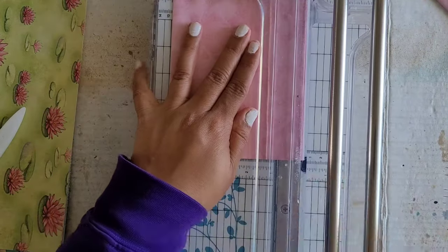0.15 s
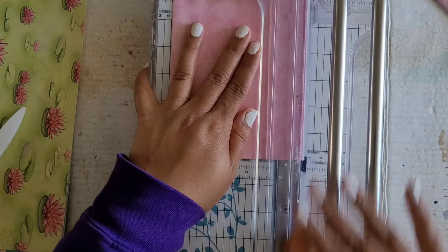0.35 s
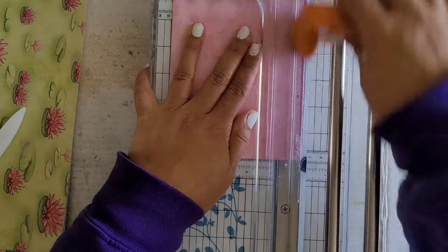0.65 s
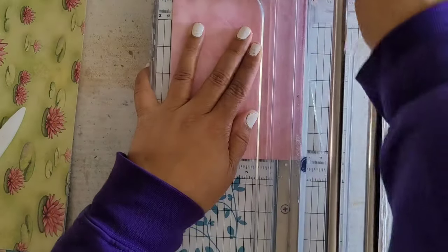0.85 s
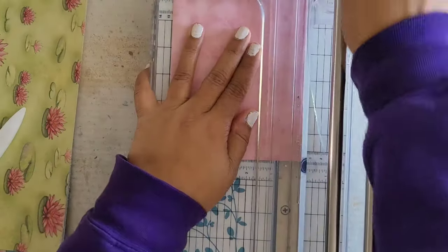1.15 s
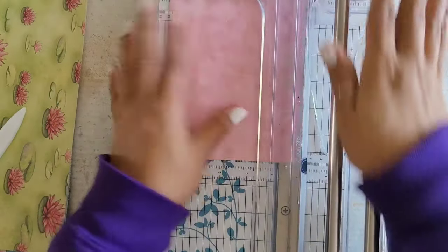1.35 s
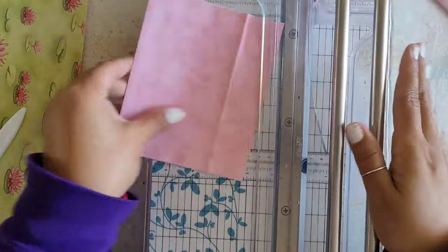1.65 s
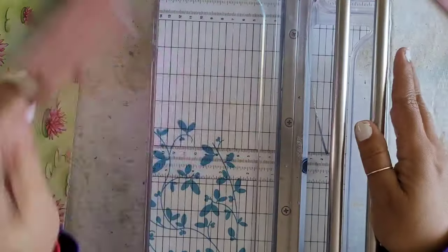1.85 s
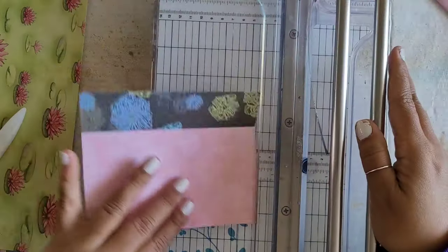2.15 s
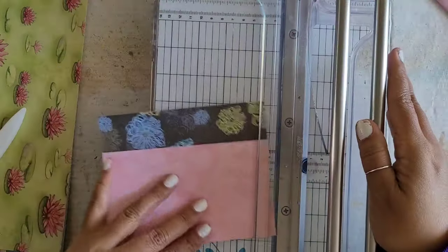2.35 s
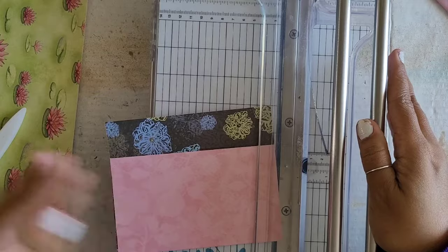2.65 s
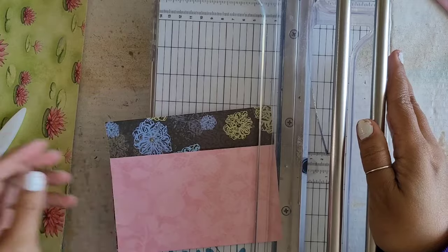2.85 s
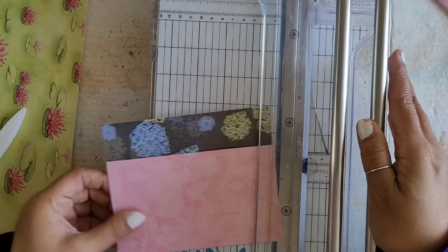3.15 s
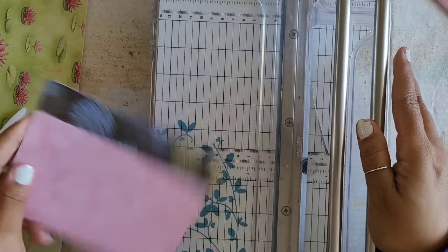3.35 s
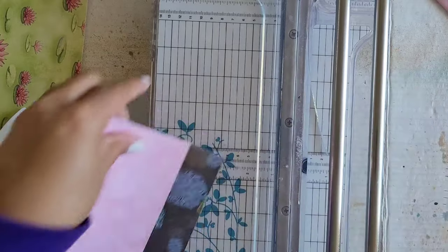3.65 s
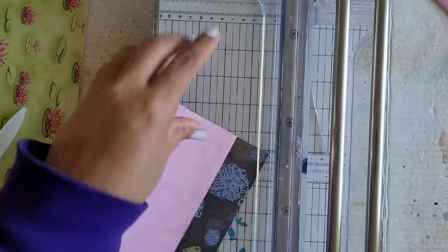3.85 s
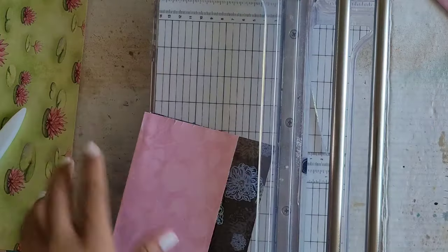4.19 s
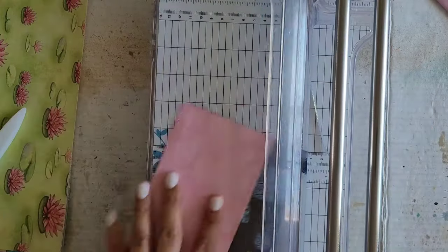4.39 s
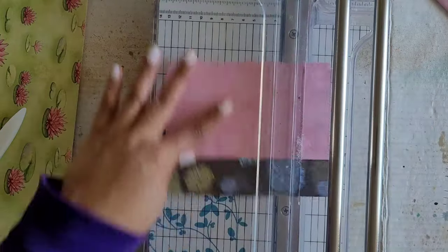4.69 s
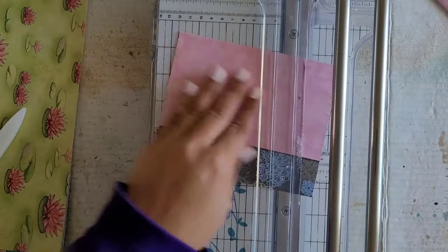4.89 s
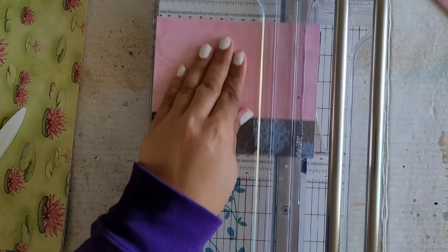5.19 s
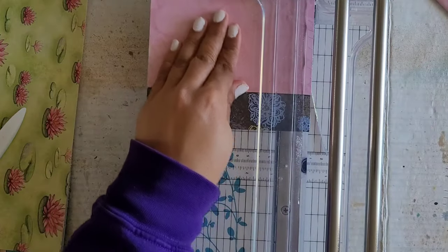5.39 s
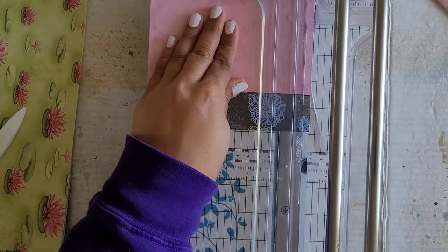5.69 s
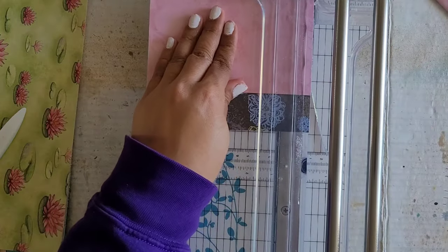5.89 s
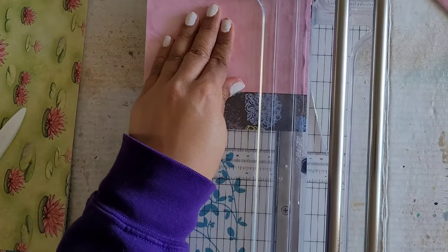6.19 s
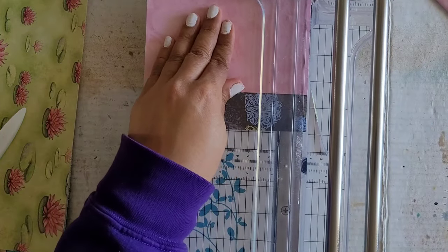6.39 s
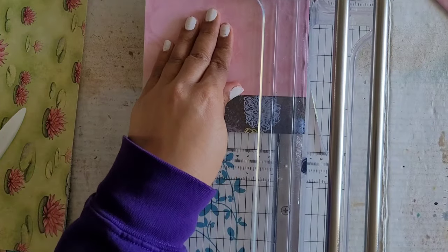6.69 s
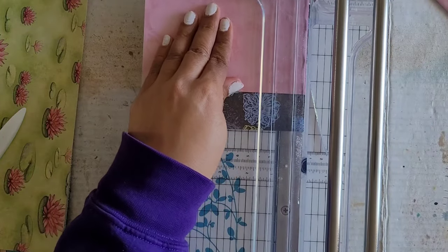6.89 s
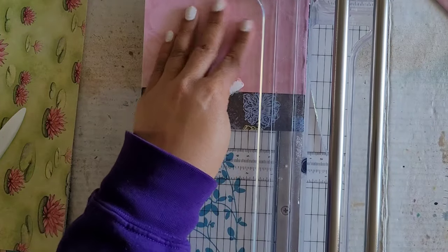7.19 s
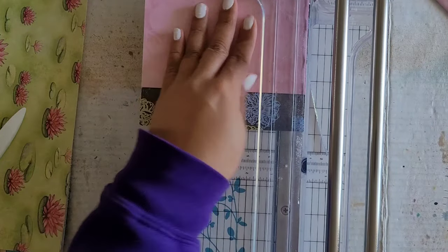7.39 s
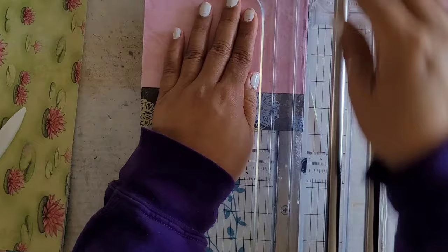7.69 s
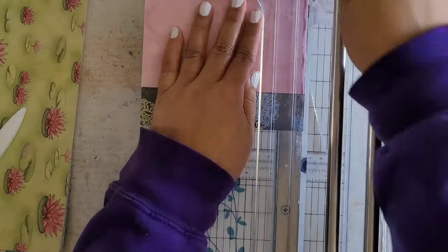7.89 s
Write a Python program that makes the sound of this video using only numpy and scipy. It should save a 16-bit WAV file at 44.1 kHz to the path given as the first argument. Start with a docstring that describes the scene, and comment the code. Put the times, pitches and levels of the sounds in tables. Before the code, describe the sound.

Close rasping cut through card with two hollow knocks, then papery hisses and light taps, a sharp plastic clack, and quiet nudging over faint hum.

```python
"""A plastic paper trimmer on a craft table in a small room, heard from close above, while something hums faintly.
First the blade carriage runs up its rail through a card, scraping and tearing, and knocks at the end.
The card is pulled out, turned and slid back: filtered random grains hiss and rub, short bursts crackle.
The clear guard snaps down and rings as fading sines, fingers nudge the card, and a second stroke just starts.
Taps and knocks are clicks that set resonances of the trimmer ringing."""
import sys
import numpy as np
from scipy import signal
from scipy.fft import rfft, irfft, next_fast_len
from scipy.io import wavfile

SR = 44100
rng = np.random.default_rng(int(sys.argv[2]) if len(sys.argv) > 2 else 0)


def generate_wav(signal):
    """Clip the signal to [-1, 1] and save it as 16-bit WAV at the path in sys.argv[1]."""
    frames = np.transpose(np.atleast_2d(signal))
    scaled = np.clip(frames, -1, 1) * 32767
    pcm = np.round(scaled).astype(np.int16)
    wavfile.write(sys.argv[1], SR, pcm)


N = 354563
TIME = np.arange(N) / SR   # seconds

# Table levels are relative: the settings given in scene() raise or lower most of them.
# The carriage knocking along its rail.
# Each row: time in seconds, knock in dB, thud in dB, tick in dB, pitch of the struck spot in Hz.
KNOCKS = [(0.3113, -15, -20.5, -26, 564), (0.966, -15, -9, -20, 1355), (1.096, -17, -10.5, -21.5, 1607),
          (7.961, -43, -52, -47, 2200)]
# The guard snapping down and rattling.
# Each row: time in seconds, knock in dB, thud in dB, tick in dB, pitch of the struck spot in Hz.
SNAPS = [(4.8346, -32, -18.5, -8, 815), (4.8405, -33, -30.5, -25, 620), (4.849, -24, -37, -28, 1240),
         (4.873, -26.5, -28, -30, 640)]
# Tone of the hollow rail. Each row: frequency in Hz, level in dB.
RAIL = [(300, -19), (900, -13.5), (1180, 6.5), (1460, 11.5), (1700, -1.5), (2000, 3), (3000, -45.5)]
# Tone of the card's fine hiss. Each row: frequency in Hz, level in dB.
HISS = [(2200, -17), (2800, -6), (4200, -8), (6400, -8), (8000, -17), (11900, -13.5), (16000, -24)]
# Tone of the guard's hard crack. Each row: frequency in Hz, level in dB.
CRACK = [(1500, -0.5), (4000, -2.5), (11500, -9.5), (16000, -14)]


def from_db(db):
    """Decibels to gain."""
    return 10 ** (np.asarray(db) / 20)


def rms_one(x):
    """Scale to unit power."""
    return x / np.sqrt(np.mean(x ** 2) + 1e-20)


def at_hz(points, hz):
    """Read a table on a log-frequency axis."""
    points = np.array(points)
    return np.interp(np.log(np.maximum(hz, 1)), np.log(points[:, 0]), points[:, 1])


def pan(db):
    """Left-over-right balance as a pair of gains."""
    return from_db(np.array([[db], [-db]]) / 2)


def drift(rate):
    """Random wander of spread 1, heading for a new value rate times a second."""
    knots = rng.standard_normal(8192)
    return rms_one(np.interp(TIME * rate, np.arange(len(knots)), knots))


def colour(pair, spectrum):
    """Two unrelated signals become left and right with the given spectrum and set likeness; power is kept."""
    # How alike left and right are. Each row: frequency in Hz, left-right correlation.
    likeness = [(100, 0.95), (500, 0.78), (1200, 0.23), (2500, 0.18), (6000, 0.29), (14000, 0.086)]
    size = next_fast_len(pair.shape[1])
    hz = np.arange(size // 2 + 1) * SR / size
    # the sound falls off steeply beyond both ends of the spectrum table
    low_cut = np.sqrt(1 + (.7 * spectrum[0][0] / (hz + 1)) ** 8)
    high_cut = np.sqrt(1 + (.7 * hz / spectrum[-1][0]) ** 8)
    shape = rms_one(from_db(at_hz(spectrum, hz)) / low_cut / high_cut)
    alike = np.clip(at_hz(likeness, hz), -1, 1)
    mid, side = rfft(pair, size) * shape
    shared = np.sqrt((1 + alike) / 2) * mid
    opposed = np.sqrt((1 - alike) / 2) * side * [[1], [-1]]
    return irfft(shared + opposed, size)[:, :pair.shape[1]]


def friction(per_s, spread_db):
    """Fibres catch and let go at random, a few much harder than the rest."""
    sizes = from_db(spread_db * np.minimum(rng.exponential(1, N), 5))
    caught = rng.random(N) < per_s / SR
    return rms_one(caught * sizes * rng.standard_normal((2, N)))


def clicks(times, sizes):
    """One click at each time."""
    out = np.zeros(N)
    np.add.at(out, np.clip(np.round(times * SR).astype(int), 0, N - 1), sizes)
    return out


def paired_clicks(times, sizes, faint_db, lead_s=0.00356):
    """One click at each time, with a fainter click shortly before it."""
    return clicks(times - lead_s, sizes * from_db(faint_db)) + clicks(times, sizes)


def ring(force, hz, width):
    """A unit click sets a damped sine of height 1 ringing; a wider resonance (Hz) dies faster."""
    r, w = np.exp(-np.pi * width / SR), 2 * np.pi * hz / SR
    return signal.lfilter([0, np.sin(w)], [1, -2 * r * np.cos(w), r * r], force + 1e-18)


def spot(force, hz):
    """A struck spot of the bed takes a cycle or two to swing up, then dies."""
    width = hz * 0.27
    return ring(ring(force, hz, width), hz, width) * 2 * np.e * np.pi * width / SR


def swell(force, seconds):
    """A unit click swells to height 1 in the given time and dies away."""
    r = np.exp(-1 / (seconds * SR))
    return signal.lfilter([0, np.e * r / (seconds * SR)], [1, -2 * r, r * r], force + 1e-18)


def bursts(rows, decay_s):
    """Envelope of sudden catches that each die away."""
    s, db = np.transpose(rows)
    return signal.lfilter([1], [1, -np.exp(-1 / (decay_s * SR))], clicks(s, from_db(db)) + 1e-18)


def move(start_s, length_s, attack_s, release_s):
    """Envelope of a movement: it gathers speed smoothly, holds and dies away."""
    age = TIME - start_s
    rise = np.sin(np.pi / 2 * np.clip(age / attack_s, 0, 1)) ** 2
    return rise * np.exp(-np.maximum(age - length_s, 0) / release_s)


def rasp(hz, width_hz):
    """Coarse friction rings a resonance that moves with the point of contact."""
    turn = np.exp(2j * np.pi * np.cumsum(hz) / SR)
    grains = colour(friction(2500, 2.5), HISS)
    # shift the moving pitch down to zero, keep a narrow band there, and shift it back up
    narrow = signal.butter(2, width_hz / 2, fs=SR, output="sos")
    return rms_one((signal.sosfilt(narrow, grains / turn) * turn).real)


def room(dry, early_db, early_s, tail_db):
    """Quick reflections off the table and near things, then a diffuse tail with its own fading time in each band."""
    # Each row: centre of the band in Hz, seconds the tail takes to fall by 60 dB.
    fade_times = [(150, 1), (600, 0.2), (2000, 0.46), (5000, 0.37), (12000, 0.12)]
    t = TIME[:SR // 2]
    hz = np.arange(len(t) // 2 + 1) * SR / len(t)
    scatter = colour(rng.standard_normal((2, len(t))), [(60, 0), (16000, 0)]) / np.sqrt(len(t))
    echo = from_db(early_db) * scatter * rms_one(np.exp(-t / early_s) * (t > .0015))
    for centre, t60 in fade_times:
        share = at_hz([(f, f == centre) for f, _ in fade_times], hz)   # 1 at this centre, 0 at the others
        band = irfft(rfft(scatter) * share, len(t))
        echo += from_db(tail_db) * band * rms_one(from_db(-60 * t / t60) * (t > .006))
    return dry + signal.fftconvolve(dry, echo, axes=1)[:, :N]


def background(air_db, hum_db, waver):
    """Dull steady air noise with a few slightly wavering tones."""
    # Tone of the air noise. Each row: frequency in Hz, level in dB.
    air = [(35, -11.5), (60, 4.5), (85, -8.5), (170, 3.5), (300, -5), (500, -11.5), (1200, -20),
           (1700, -33.5), (2500, -38.5), (3500, -31), (5000, -48), (6400, -29.5), (7800, -62.5),
           (16000, -40)]
    # Steady tones. Each row: frequency in Hz, level in dB.
    tones = [(82, -60.5), (120, -61), (1125, -71)]
    hum = 0
    for hz, db in tones:
        phase = 2 * np.pi * hz * TIME + waver * drift(3.4)
        hum += from_db(db + hum_db) * np.sqrt(2) * np.sin(phase)
    return from_db(-56 + air_db) * colour(rng.standard_normal((2, N)), air) + hum


def forearms(lumpy_db):
    """Arms and sleeves drag unevenly on the table top."""
    # Forearms shifting. Each row: start in seconds, length in seconds, level in dB.
    arm_moves = [(0, 1.57, -52.5), (1.9, 0.82, -60.5)]
    # Their tone through the table top. Each row: frequency in Hz, level in dB.
    dull = [(60, -1), (130, 4), (200, 2), (330, -9)]
    level = sum(from_db(db) * move(s, length, attack_s=0.014, release_s=0.097) for s, length, db in arm_moves)
    return level * from_db(lumpy_db * drift(22.78)) * colour(rng.standard_normal((2, N)), dull)


def table_bumps():
    """Heavy contacts reach the table top, which booms briefly."""
    # Heavy contacts, the guard snap among them, shaking the table. Each row: time in seconds, level in dB.
    bumps = [(0.969, -34), (2.135, -28.5), (4.84, -27.5)]
    # Resonances of the table top. Each row: frequency in Hz, width in Hz, level in dB.
    modes = [(155, 9.5, -13), (230.2, 44, 1), (376, 170, 8)]
    s, db = np.transpose(bumps)
    return sum((-1) ** k * ring(clicks(s, from_db(db + level)), hz, width)
               for k, (hz, width, level) in enumerate(modes))


def nudges(nudge_db):
    """Fingertips nudge the card: each short push swells and dies away."""
    # Each row: middle of the push in seconds, half length in seconds, level in dB.
    pushes = [(6.062, 0.028, -65), (6.26, 0.017, -57.5), (6.771, 0.018, -61.5), (6.922, 0.016, -56),
              (7.328, 0.036, -54.5)]
    return sum(from_db(db + nudge_db) * np.exp(-.5 * ((TIME - s) / half) ** 2) for s, half, db in pushes)


def slides():
    """Gains of the hiss, its top and the rub; each slide gathers speed, holds and dies away."""
    # The card pulled, turned and pushed over the bed.
    # Each row: start in seconds, length in seconds, hiss in dB, rub in dB, lift of the hiss's top in dB.
    card_moves = [(1.256, 0.36, -55.5, -51.5, 3), (1.658, .16, -55, -46, 7), (1.816, 0.24, -56.5, -59, 9.5),
                  (2.17, 0.49, -59, -62.5, 3.5), (2.39, 0.16, -56, -83, 1), (3.277, 0.092, -57, -64, 3.5),
                  (3.346, 0.46, -62.5, -62, 6.5), (3.828, 0.35, -68, -65, 7.5),
                  (4.425, 0.04, -46.5, -50, 3), (4.518, 0.11, -40.5, -52.5, 1),
                  (4.658, 0.25, -47, -53.5, 7), (5.086, 0.017, -50.5, -49.5, 1),
                  (5.142, 0.38, -52, -60, 1.5), (7.465, 0.099, -53, -53.5, 3.5),
                  (7.628, 0.6, -64, -64, -4.5)]
    s, length, hiss, rub, lift = np.transpose(card_moves)
    # the rise takes a third of each slide's length
    shapes = np.array([move(start, span, 0.33 * span, release_s=0.046) for start, span in zip(s, length)])
    return from_db([hiss, hiss + lift, rub]) @ shapes


def card(hiss_db, rub_db, scratch_db, flutter_db, clump_db, top_hz):
    """Sliding card hisses, its edge scratches at a wandering pitch; pressed edges catch in clumps and rub the bed."""
    # Tone of the rub through the bed. Each row: frequency in Hz, level in dB.
    rub_tone = [(350, 2), (650, 8.5), (1000, -1), (1400, 3.5), (3200, -5.5)]
    hiss, top, rub = slides()
    flutter = flutter_db * drift(40)
    fibres = colour(friction(14000, 2.6), HISS)
    treble = signal.sosfiltfilt(signal.butter(2, top_hz, "high", fs=SR, output="sos"), fibres)
    fine = (hiss * from_db(hiss_db) + nudges(nudge_db=-6.0)) * fibres
    fine += (top - hiss) * from_db(hiss_db) * treble   # brightens or dulls each slide
    fine *= from_db(flutter)
    clumps = clump_db * drift(70)
    scratch_hz = 3600 * np.exp(.18 * drift(11))
    scratch = hiss * from_db(scratch_db + clumps) * rasp(scratch_hz, width_hz=380)
    catches = friction(2200, 2.6)
    return fine + scratch + rub * from_db(rub_db + clumps) * colour(catches, rub_tone)


def crackles(crackle_s, knock_hz):
    """Small dry crackles with a low knock, from the card and just before the guard snaps."""
    # Each row: time in seconds, crackle in dB, low knock in dB.
    small_sounds = [(1.3239, -44.5, -38.5), (1.4432, -40.5, -39), (1.556, -48, -63), (1.704, -59, -43),
                    (1.749, -47, -38), (1.791, -43, -38), (2.035, -43, -39), (3.238, -53.5, -52.5),
                    (3.361, -42, -49), (3.648, -66, -42), (3.763, -52, -48), (4.824, -45, -30),
                    (7.454, -56, -50), (7.505, -54, -38.5), (7.553, -55, -43.5)]
    # Tone of the crackle. Each row: frequency in Hz, level in dB.
    crinkle = [(1000, 3), (4000, -5), (13000, -16)]
    s, crackle, low_knock = np.transpose(small_sounds)
    crisp = swell(clicks(s, from_db(crackle)), crackle_s) * rng.standard_normal((2, N))
    return colour(crisp, crinkle) + spot(clicks(s, from_db(low_knock)), knock_hz)


def strike(rows, crack, body_db, spot_db, tick_db, tick_s, tick_pan_db, faint_db):
    """Each blow rings the spot it hits and the trimmer: low modes by its thud, high by its knock, plus a crack."""
    # The plastic bed and rail. Each row: frequency in Hz, width in Hz, level in dB.
    trimmer = [(489.7, 110, -0.5), (799, 250, 0), (1060, 220, -3), (1300, 200, -4.5), (1980, 350, -8.5),
               (3024, 700, -10), (4170, 650, -20)]
    s, knock, thud, tick, pitch = np.transpose(rows)

    def force_db(hz):
        """Strength of each blow: the thud up to 800 Hz, passing to the knock over half an octave."""
        return thud + np.clip(np.log2(hz / 800) * 2, 0, 1) * (knock - thud)

    spot_sizes = from_db(force_db(pitch) + spot_db)
    body = sum(spot(paired_clicks(t, size, faint_db), hz) for t, size, hz in zip(s, spot_sizes, pitch))
    for k, (hz, width, db) in enumerate(trimmer):
        strength = from_db(force_db(hz) + db + body_db + 2 * rng.standard_normal(len(s)))
        # neighbouring modes swing in opposite directions
        body -= (-1) ** k * ring(paired_clicks(s, strength, faint_db), hz, width)
    crush = swell(paired_clicks(s, from_db(tick + tick_db), faint_db), tick_s)
    return body + colour(crush * rng.standard_normal((2, N)), crack) * pan(tick_pan_db)


def guard_ring(rattle_db, rattle_s):
    """The hardest blow leaves the stiff guard ringing and chattering on its hinge."""
    # Long rings of the guard. Each row: frequency in Hz, level in dB.
    long_rings = [(646, -30.5), (800, -27.5), (1214, -27.5), (1512, -37), (1911, -38), (3080, -46.5),
                  (3760, -44.5)]
    s = max(SNAPS, key=lambda row: row[3])[0]   # the snap with the loudest tick
    width = np.log(1000) / np.pi / .3   # falls by 60 dB in 0.3 s
    rings = sum((-1) ** k * ring(clicks(np.array([s]), from_db(db)), hz, width)
                for k, (hz, db) in enumerate(long_rings))
    chatter = friction(900, 1)
    return rings + bursts([(s, rattle_db)], rattle_s) * colour(chatter, CRACK)


def rail_ring(ring_db, ring_s):
    """Each knock of the carriage also sets the hollow rail buzzing for a moment."""
    fading = bursts([(s, knock + ring_db) for s, knock, *_ in KNOCKS], ring_s)
    return fading * colour(rng.standard_normal((2, N)), RAIL)


def carriage_speed():
    """Speed as a gain, 1 at full speed and 0 between the strokes."""
    # Speed as the level of the scraping: one list for each stroke, the second just starting.
    # Each row: time in seconds, level in dB.
    strokes = [
        [(0.06, -73), (0.265, -48), (0.391, -49), (0.397, -41.5), (0.448, -35), (0.482, -47), (0.497, -34),
         (0.635, -36.5), (0.76, -42), (0.855, -41.5), (0.9, -55.5), (1.09, -51), (1.2, -108)],
        [(7.94, -72), (7.952, -64), (8.04, -73)],
    ]
    full_speed_db = -32.5
    return sum(from_db(np.interp(TIME, *np.transpose(stroke), left=-np.inf, right=-np.inf) - full_speed_db)
               for stroke in strokes)


def carriage(rail_db, blade_db, scrape_db, rasp_db, judder_db):
    """The slider judders and rasps along its rail, louder with speed; the blade tears fibres, catches and jolts."""
    # Tone of the blade. Each row: frequency in Hz, level in dB.
    blade_tone = [(130, -17), (300, -14), (500, 2), (820, -2), (1400, -5.5)]
    # Tone of the scraping. Each row: frequency in Hz, level in dB.
    scrape_tone = [(2300, -19.5), (2750, 1.5), (4200, 2), (5100, -4), (6450, 0), (8800, -9.5), (11800, -5),
                   (16000, -14)]
    # The blade catching in the card. Each row: time in seconds, level in dB, pitch of the jolted spot in Hz.
    blade_catches = [(0.5885, -26.5, 534), (0.64, -27, 560), (0.6613, -25.5, 1560), (0.698, -28, 1320),
                     (0.764, -29, 816), (0.785, -27.5, 520), (0.853, -35.5, 372.2)]
    # Resonances that shift as the slider travels.
    # Each row: time in seconds, rasp pitch in Hz, rail pitch as a ratio.
    travel = [(0.44, 3870, 0.94), (0.57, 3850, 1.055), (0.66, 3000, 1.08), (0.73, 4130, 0.9),
              (0.95, 3100, .96), (7.96, 3750, 1)]
    scrape = carriage_speed()
    s, *columns = np.transpose(travel)
    rasp_hz, rail_pitch = [np.interp(TIME, s, column) for column in columns]
    judder = judder_db * drift(110)

    jolts = sum(spot(clicks(np.array([t]), from_db(db)), hz) for t, db, hz in blade_catches)
    # a short rub follows each catch, 13 dB below its jolt setting
    caught = bursts([(t, db - 13) for t, db, _ in blade_catches], decay_s=0.0036)
    in_card = move(start_s=0.59, length_s=0.27, attack_s=0.0057, release_s=0.024)
    grip = np.maximum(in_card, from_db(-10))   # outside the card the blade runs in its empty groove
    blade = scrape ** 0.43 * grip * from_db(blade_db) + caught

    # reading the rail's sound faster or slower raises or lowers its pitch
    place = np.cumsum(rail_pitch)
    hollow = np.array([np.interp(place, np.arange(N), side) for side in colour(friction(3000, 2.1), RAIL)])
    out = jolts + scrape ** 0.91 * from_db(rail_db + judder) * hollow
    out += blade * from_db(judder) * colour(friction(700, 2.86), blade_tone)
    out += scrape ** 0.91 * from_db(rasp_db + judder) * rasp(rasp_hz, width_hz=620)
    tearing = friction(5000, 2.5)
    out += scrape * from_db(scrape_db + .5 * judder) * colour(tearing, scrape_tone)
    return out + rail_ring(ring_db=-19.0, ring_s=0.015)


def scene():
    """Contacts and slides sound in the room; the guard's ring, the arms and the background are added without echo."""
    # Card edges and fingers touching the bed.
    # Each row: time in seconds, knock in dB, thud in dB, tick in dB, pitch of the struck spot in Hz.
    touches = [(0.1381, -30, -36.5, -43, 638.7), (0.202, -31, -36, -50, 600),
               (1.713, -31.5, -49, -40, 1070), (1.8928, -39, -32.5, -60, 710), (1.9625, -28, -37, -44, 650),
               (2.139, -20.5, -30, -41, 760), (2.2964, -61, -32.5, -75, 684), (2.5725, -24, -24, -33, 650),
               (2.7245, -28.5, -42, -45.5, 675), (3.371, -30, -35.5, -58, 520),
               (3.5921, -28, -35.5, -50, 808), (4.037, -36, -32.5, -74, 590),
               (4.184, -26.5, -36.5, -36.5, 710), (4.426, -36, -44, -43.5, 700),
               (5.1006, -35, -39.5, -50, 707), (5.5175, -27, -31, -53, 696),
               (5.9593, -36, -42.5, -48.5, 587), (6.2762, -41.5, -39, -70, 673),
               (6.4563, -30, -39.5, -45, 580), (6.9351, -35.5, -40.5, -68, 539.5),
               (7.5891, -35, -37, -42, 1246)]
    # Tone of the tick of a tap or knock. Each row: frequency in Hz, level in dB.
    tick_tone = [(1500, -1), (4000, -0.5), (5200, -8), (6600, -5), (8500, -14), (11500, -12.5),
                 (16000, -21.5)]
    air = background(air_db=1.0, hum_db=-0.5, waver=0.39)
    arms = forearms(lumpy_db=4.0)
    sliding = card(hiss_db=-6.0, rub_db=-7.0, scratch_db=-16.5, flutter_db=1.0, clump_db=4.5, top_hz=7750)
    sliding += crackles(crackle_s=0.0013, knock_hz=626)
    taps = strike(touches, tick_tone, body_db=-1.0, spot_db=1.0, tick_db=1.0, tick_s=0.0012,
                  tick_pan_db=0.0, faint_db=-15.5)
    knocks = strike(KNOCKS, tick_tone, body_db=-11.5, spot_db=-0.5, tick_db=-6.0, tick_s=0.0018,
                    tick_pan_db=-1.5, faint_db=-26.5)
    guard = strike(SNAPS, CRACK, body_db=3.0, spot_db=8.5, tick_db=1.0, tick_s=0.00081,
                   tick_pan_db=-4.0, faint_db=-22.5)
    cut = carriage(rail_db=-31.5, blade_db=-36.5, scrape_db=-33.0, rasp_db=-36.0, judder_db=1.5)
    handling = room(taps + knocks + table_bumps() + cut + sliding, early_db=-4.0, early_s=0.0075, tail_db=-8.0)
    snap = room(guard, early_db=-16.5, early_s=0.048, tail_db=-5.0)
    snap += guard_ring(rattle_db=-33.5, rattle_s=0.028)
    return handling + snap + arms + air


def record(dry):
    """The loudest peaks are rounded and the top of the treble is cut steeply."""
    rounded = .9 * np.tanh(dry / .9)
    steep_cut = signal.ellip(10, .1, 80, 15900, fs=SR, output="sos")   # cutoff 15900 Hz
    return signal.sosfilt(steep_cut, rounded)


dry = scene()
out = record(dry)
generate_wav(out)
```